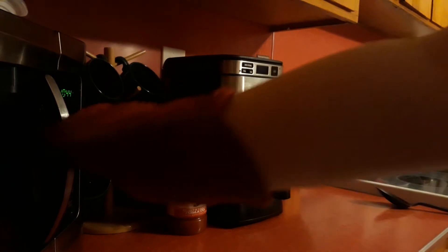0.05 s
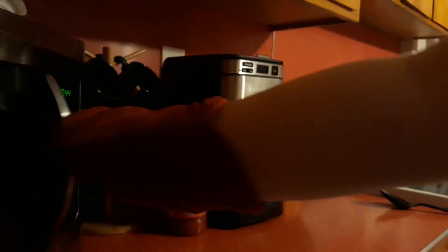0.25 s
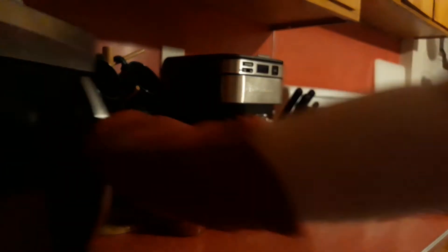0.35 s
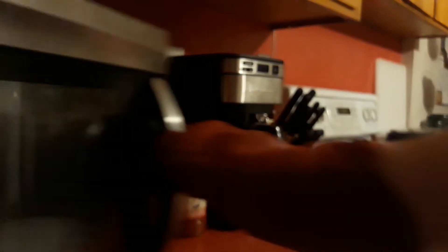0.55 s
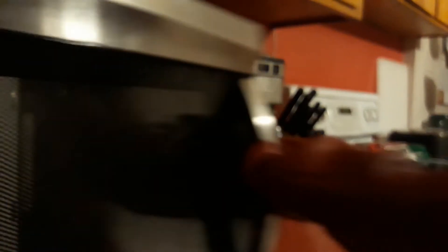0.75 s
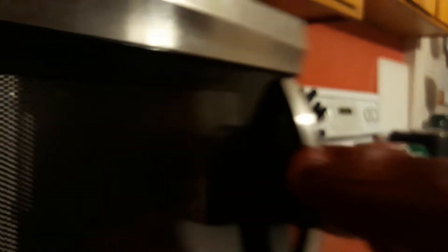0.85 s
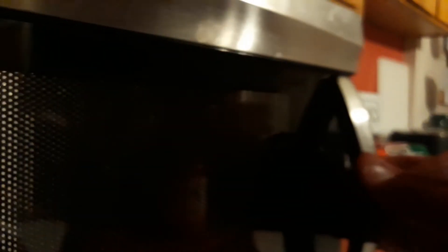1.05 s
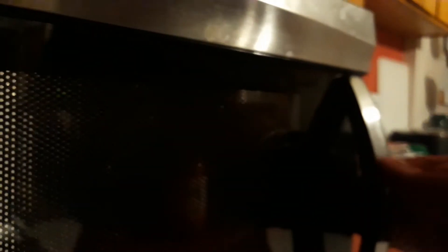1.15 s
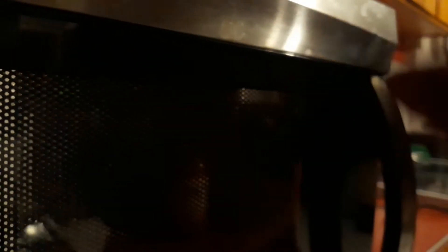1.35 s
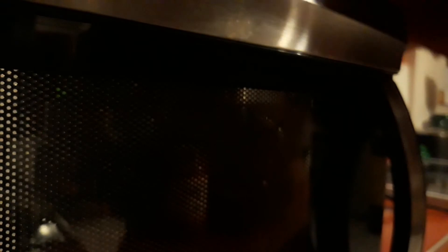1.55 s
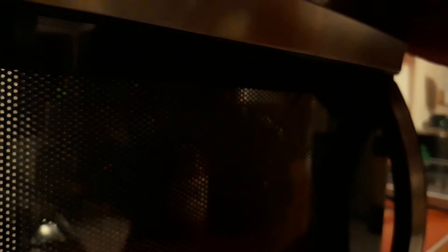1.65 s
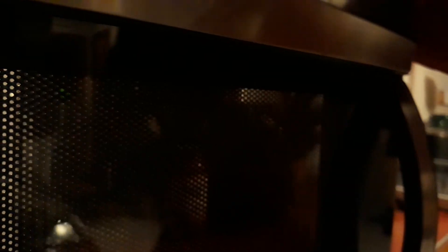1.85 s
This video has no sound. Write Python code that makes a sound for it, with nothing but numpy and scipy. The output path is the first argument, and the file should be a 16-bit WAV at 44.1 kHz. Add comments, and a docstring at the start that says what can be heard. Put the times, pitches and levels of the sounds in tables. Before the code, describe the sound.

A microwave door is pulled open close by in a small kitchen. The handle ticks, the latch snaps free with a loud, ringing clunk, and the door swings with soft knocks before a light plastic click over faint room rumble.

```python
"""In a small kitchen, a microwave door is pulled open at arm's length. The handle ticks under
the strain, then the latch hooks scrape over their catches and snap free. The oven rocks on
its feet, and its steel case booms and rings on. The loose door rattles and swings with a few
soft knocks and a rub of the hinge, then meets its plastic stop with a quick click and rebound.
Behind it all are a low room rumble and a faint hiss."""
import sys
import numpy as np
from scipy import signal
from scipy.fft import rfft, irfft
from scipy.io import wavfile
from scipy.ndimage import uniform_filter1d

SR = 44100
rng = np.random.default_rng(int(sys.argv[2]) if len(sys.argv) > 2 else 0)


def store_wav(level_fs):
    """Save 16-bit WAV to argv[1]."""
    pcm = np.round(np.clip(np.atleast_2d(level_fs), -1, 1) * 32767)
    wavfile.write(sys.argv[1], SR, pcm.T.astype(np.int16))


N = 83790
ALIKE_HZ = 566  # below about this pitch, both ears hear nearly the same


def amp(db):
    """Turn decibels into a number to multiply by."""
    return 10 ** (np.asarray(db) / 20)


def at(points, hz):
    """Look up a pitch in a table, blending between its rows."""
    pitches, values = np.array(points, float).T
    return np.interp(np.log(hz + 1), np.log(pitches), values)


def clock():
    """The time of every sample, in seconds."""
    return np.arange(N) / SR


def freqs():
    """The pitch of every slot in a spectrum, in Hz."""
    return np.arange(N // 2 + 1) * SR / N


def pan(x, balance):
    """Make each pitch louder in one ear than in the other."""
    return irfft(rfft(x) * amp(np.array([[.5], [-.5]]) * at(balance, freqs())), N)


def noise(tone):
    """Stereo noise of strength 1, shaped by a tone table and alike in both ears in the bass."""
    mid, side = rfft(rng.standard_normal((2, N)))
    alike = 1 / (1 + (freqs() / ALIKE_HZ) ** 3)
    both = mid * np.sqrt(1 + alike) + side * np.sqrt(1 - alike) * np.array([[1], [-1]])
    x = irfft(both * amp(at(tone, freqs())), N)
    return x / x.std()


def fade(fade_s):
    """A smooth dying away that falls 60 dB in fade_s seconds."""
    return np.exp(-np.log(1000) * clock() / max(fade_s, .002))


def through(x, response):
    """Play a sound through an object or room, given its response to one sharp tap."""
    return signal.fftconvolve(np.atleast_2d(x), np.atleast_2d(response), axes=1)[:, :N]


def ring(notes, sign=-1, swell_cycles=.14):
    """The fading notes of a struck object; sign=-1 turns every second wave upside down."""
    t, ears, out = clock(), np.array([[.5], [-.5]]), 0
    for k, (hz, db, fade_s) in enumerate(notes):
        envelope = (1 - np.exp(-t * hz / swell_cycles)) * fade(fade_s)
        ear_shift = ears * min(hz / ALIKE_HZ, np.pi / 2)  # high notes reach the ears out of step
        out = out + sign ** k * amp(db) * envelope * np.sin(2 * np.pi * hz * t + ear_shift)
    return out


def push(db, bass, middle, treble, top, size=2048):
    """The short push of one hit, with its own loudness and its own bass, middle, treble and top."""
    hz = np.arange(size // 2 + 1) * SR / size
    tone = at([(200, bass), (500, 0), (900, 0), (1800, middle), (5000, treble), (11000, top)], hz)
    # keep this tone, but pack the energy at the very start (minimum phase)
    cepstrum = irfft(np.log(amp(db + tone)))
    cepstrum[1:size // 2] *= 2
    cepstrum[size // 2 + 1:] = 0
    return irfft(np.exp(rfft(cepstrum)))


def pushes(hits):
    """Place the push of each hit at its start time."""
    out = np.zeros(2 * N)
    for start_s, *levels in hits:
        i, pulse = int(start_s * SR), push(*levels)
        out[i:i + len(pulse)] += pulse
    return out[:N]


def strike(hits, tone, fade_s, size=8192):
    """Each hit wakes so many short notes at once that they blur into a burst of noise."""
    out, dense, decay = np.zeros((2, N)), noise(tone), fade(fade_s)[:size]
    for k, (start_s, *levels) in enumerate(hits):
        i = int(start_s * SR)
        burst = np.roll(dense, -k * (size // 2), axis=1)[:, :size] * decay
        out[:, i:i + size] += through(push(*levels), burst)[:, :size]
    return out


# hooks hitting their catches: start_s, level_db, bass_db, middle_db, treble_db, top_db
# (the last four are added to level_db, each in its own range of pitch)
LATCH_HITS = [(.2215, -24.5, 2.5, -4, 6, 5.5), (.240, -26.5, 3, -9.5, 8, -16.5),
              (.2532, -22, 2, -5.5, 8, 6), (.266, -20.5, -16.5, -1, 6, 12), (.2705, -16, -3.5, 3.5, 8.5, 0),
              (.278, -23.5, -2, 5.5, -4, -7.5), (.286, -23.5, -3, 8.5, 11.5, 6.5),
              (.2925, -10, -6.5, 1.5, -2.5, -1.5), (.302, -14, -1, 1, -5, -2.5),
              (.312, -19, 6, -2.5, -2.5, -15), (.334, -25.5, 6.5, -9, 10.5, 12.5), (.349, -32, -7, 2, 8, 9),
              (.432, -42.5, 10.5, 17, -9, 8), (.508, -45.5, -5, -2, 12.5, 6.5)]
# tone of the oven's panels: pitch_hz, level_db
PANEL_TONE = [(50, -32), (100, 0), (200, 6.5), (400, 3.5), (850, -0.5), (1250, -5.5), (2100, -2.5),
              (3300, -2.5), (5000, -8), (6600, -9.5), (8200, -28), (12000, -21), (16000, -23)]
# ringing notes of the steel case: pitch_hz, level_db, fade_s
CASE_NOTES = [(106, -17.5, .3), (159, -14.5, 0.84), (191.2, -22, 0.68), (232.4, -24, 0.75),
              (300.2, -24.5, 0.86), (330.7, -20, 0.63), (393, -32, 3.1), (403.5, -14.5, 0.15),
              (524, -12.5, 0.21), (571, -12.5, .2), (634.5, -18, 0.31), (834, -12, 0.16)]
# ringing notes of the latch springs: pitch_hz, level_db, fade_s
SPRING_NOTES = [(1819, -34, 1.1), (1991, -15, 0.076), (2186, -34, 0.72), (2308, -18.5, 0.18),
                (5240, -34, 0.46), (5636, -39, 0.99), (5755, -44, 2.2)]
# how much louder the door is in the left ear: pitch_hz, left_minus_right_db
DOOR_BALANCE = [(100, 4), (2400, 2.5), (4400, -1.5), (8000, 7), (15000, 5)]
def latch(room, beat_hz=2.4, beat_depth=.45, echo_db=-6.5):
    """The hooks scrape and snap, shaking the panels, case, springs and hollow inside of the oven."""
    panels = strike(LATCH_HITS, PANEL_TONE, fade_s=.099) + scrape()
    inside = amp(-22) * noise(PANEL_TONE) * fade(.061)
    # the two springs are slightly out of tune, so their ring wobbles
    beat = 1 + beat_depth * np.cos(2 * np.pi * beat_hz * clock())
    metal = through(pushes(LATCH_HITS), ring(CASE_NOTES) + beat * ring(SPRING_NOTES) + inside)
    return pan(panels + amp(echo_db) * through(panels, room) + metal, DOOR_BALANCE)


def scrape(start_s=.219, end_s=.305, grain_s=.0011, rough_db=.5):
    """The hooks slide with a gritty sound, louder as the pull grows."""
    t = clock()
    grit = uniform_filter1d(rng.standard_normal(N), int(grain_s * SR))
    db = np.interp(t, [start_s, end_s], [-31, -21]) + rough_db * grit / grit.std()
    return noise(PANEL_TONE) * amp(db) * (t > start_s) * (t < end_s)


# the oven rocking on its feet: start_s, level_db, pitch_hz, length_s
ROCKING_THUMPS = [(.268, -15.5, 104, 0.051), (.318, -20.5, 112, .046), (0.421, -29, 119.8, .045)]
def thumps():
    """The whole oven is tugged and rocks back: a few deep waves that swell and die."""
    out = np.zeros(N)
    for start_s, db, hz, length_s in ROCKING_THUMPS:
        t = np.clip(clock() - start_s, 0, length_s)
        out += amp(db) * np.sin(np.pi * t / length_s) * np.sin(2 * np.pi * hz * t)
    return pan(out, DOOR_BALANCE)


# dull bumps of the handle, case and hinge: start_s, level_db, pitch_hz
DULL_KNOCKS = [(.033, -29, 458), (0.21, -22.5, 420), (0.218, -19, 200), (0.295, -16, 525), (.512, -31, 746),
               (1.174, -51, 740), (1.257, -43, 750), (1.3465, -29, 340), (1.356, -42.5, 447)]
def knocks(room, swell_cycles=.52, fade_cycles=7.7, echo_db=-14):
    """Each soft bump sounds one note that dies within a few waves."""
    out = np.zeros(N)
    for start_s, db, hz in DULL_KNOCKS:
        cycles = np.maximum(clock() - start_s, 0) * hz
        swell = 1 - np.exp(-cycles / swell_cycles)
        decay = np.exp(-np.log(1000) * cycles / fade_cycles)
        out += 2 * amp(db) * swell * decay * np.sin(2 * np.pi * cycles)
    return pan(out + amp(echo_db) * through(out, room), DOOR_BALANCE)


# the door hitting its stop: start_s, level_db, bass_db, middle_db, treble_db, top_db
STOP_HITS = [(1.5697, -41, 3.5, 16, 14.5, -14), (1.5765, -34.5, -4.5, -2, -1, -13),
             (1.5799, -32.5, -9.5, -9.5, 2.5, -5)]
# hollow notes of the plastic stop: pitch_hz, level_db, fade_s
STOP_NOTES = [(828, 7, 0.035), (1700, -2, 0.043), (1860, 5.5, 0.0066), (2860, 2.5, 0.015),
              (3440, 1.5, 0.009)]
# tone of the stop's crack: pitch_hz, level_db
CRACK_TONE = [(80, 4.5), (500, 0), (1100, -4.5), (1500, 0), (2400, -15.5), (4700, -18), (6200, -11),
              (8500, -31.5), (16000, -44)]
# how much louder the stop is in the left ear: pitch_hz, left_minus_right_db
STOP_BALANCE = [(100, 8.5), (800, 0), (2400, 3), (4400, -5), (8000, 6)]
def door_stop(room, crack_echo_db=-7, hollow_echo_db=-15):
    """The door meets its stop with a hollow plastic click and a duller rebound."""
    hollow = through(pushes(STOP_HITS), ring(STOP_NOTES, sign=1))
    crack = amp(3.5) * strike(STOP_HITS, CRACK_TONE, fade_s=.046)
    echo = through(amp(crack_echo_db) * crack + amp(hollow_echo_db) * hollow, room)
    return pan(hollow + crack + echo, STOP_BALANCE)


# dry ticks of the handle: start_s, level_db, bass_db, middle_db, treble_db, top_db
HANDLE_TICKS = [(.1276, -36, 7.5, -5.5, 5, 7), (.1386, -43.5, -8, -4, 12.5, 15.5),
                (.1605, -39, 4.5, 2, 8.5, 2), (1.3565, -50.5, 8, 12, -8, -13)]
def handle(room, echo_db=-3):
    """The plastic handle ticks as it takes the strain."""
    ticks = strike(HANDLE_TICKS, PANEL_TONE, fade_s=.024)
    return pan(ticks + amp(echo_db) * through(ticks, room), DOOR_BALANCE)


# the door rattling under the pull, then once free: start_s, end_s, start_level_db, end_level_db
RATTLE_SPELLS = [(0.107, 0.221, -45.5, -36.5), (0.616, .69, -55, -41)]
# dull tone of the door frame: pitch_hz, level_db
FRAME_TONE = [(70, -6.5), (140, 1.5), (300, -3.5), (1000, -29), (4000, -51.5)]
def rattle(taps_per_s=220):
    """Many light, uneven taps of the loose door blur into a soft rattle."""
    t, taps = clock(), np.zeros(N)
    for start_s, end_s, start_db, end_db in RATTLE_SPELLS:
        random_taps = rng.standard_normal(N) * (rng.random(N) < taps_per_s / SR)
        db = np.interp(t, [start_s, end_s], [start_db, end_db])
        taps += random_taps * amp(db) * (t > start_s) * (t < end_s)
    frame = noise(FRAME_TONE) * fade(.07)
    frame /= np.sqrt(np.sum(frame ** 2) / 2 * taps_per_s / SR)  # equally loud at any tap rate
    return pan(through(taps, frame), DOOR_BALANCE)


# tone of the rubbing hinge: pitch_hz, level_db
HINGE_TONE = [(120, -6.5), (280, 1), (450, 8), (590, -30), (770, 3), (1100, -47), (3000, -34),
              (8000, -59.5)]
def hinge(peak_s=1.273, rise_db_per_s=142, fall_db_per_s=108, squeak_hz=4750, width_hz=60):
    """A soft rub and a thin, unsteady squeak swell and fade as the door swings."""
    past_peak_s = clock() - peak_s
    swell = amp(np.minimum(past_peak_s * rise_db_per_s, -past_peak_s * fall_db_per_s))
    spectrum = rfft(rng.standard_normal((2, N)))
    squeak = irfft(spectrum / (1 + ((freqs() - squeak_hz) / width_hz) ** 2), N)
    rub = amp(-49) * noise(HINGE_TONE)
    return pan(swell * (rub + amp(-68) * squeak / squeak.std()), DOOR_BALANCE)


# how long the kitchen's echo lasts: pitch_hz, fade_s
ECHO_FADES = [(100, 0.62), (300, 0.67), (2000, 0.49), (5000, 0.43), (9000, 0.21)]
def kitchen(bands=10, build_s=.004):
    """The room answers a tap with a smooth wash of echoes; the high pitches die first."""
    white = rfft(noise([(20, 0), (20000, 0)]))
    pitches, tail = np.geomspace(60, 16000, bands), 0
    for hz, share in zip(pitches, np.eye(bands)):
        band = irfft(white * at(list(zip(pitches, share)), freqs()), N)
        tail = tail + band * fade(at(ECHO_FADES, hz))
    tail *= 1 - np.exp(-clock() / build_s)
    return tail / np.sqrt(np.sum(tail ** 2) / 2)


# tone of the low room rumble: pitch_hz, level_db
RUMBLE_TONE = [(25, -20.5), (55, -16), (85, 1), (120, 1), (175, -2.5), (260, -14), (420, -24.5), (800, -39),
               (2000, -72)]
# tone of a soft rushing sound in the middle pitches: pitch_hz, level_db
RUSH_TONE = [(200, -1.5), (420, 2.5), (620, -1.5), (830, -1), (1300, -6), (2100, -2.5), (3000, -3),
             (4200, -3.5), (8000, -43.5)]
# tone of the faint high hiss: pitch_hz, level_db
HISS_TONE = [(1500, -21.5), (3000, -25.5), (4300, -1.5), (6300, -1.5), (8300, -23), (11000, -18.5),
             (15500, -14)]
# how the rush and the hiss rise and fall: time_s, rush_db, hiss_db
AIR_LEVELS = [(0, -50.5, -59.5), (0.099, -58.5, -65), (.2, -57.5, -81), (.55, -48.5, -61),
              (.68, -60.5, -56), (.8, -65.5, -66), (1.03, -75, -65.5), (1.2, -66, -61.5),
              (1.271, -60, -60.5), (1.328, -52, -52), (1.41, -60.5, -62.5), (1.54, -61.5, -56.5),
              (1.65, -55.5, -57), (1.788, -50.5, -56), (1.9, -55, -59.5)]
# how much louder the background is in the left ear: pitch_hz, left_minus_right_db
AIR_BALANCE = [(100, 2.5), (500, 2.5), (2400, 1.5), (4400, -4.5), (8000, 3), (15000, -2)]
def background(rumble_db=-53.5):
    """The room rumbles steadily; a soft rush and hiss sink after the clunk and swell again."""
    time_s, rush_db, hiss_db = np.array(AIR_LEVELS).T
    rush = noise(RUSH_TONE) * amp(np.interp(clock(), time_s, rush_db))
    hiss = noise(HISS_TONE) * amp(np.interp(clock(), time_s, hiss_db))
    return pan(rush + hiss + amp(rumble_db) * noise(RUMBLE_TONE), AIR_BALANCE)


def scene():
    """Add up the sounds of the door and its kitchen."""
    room = kitchen()
    door = handle(room) + rattle() + latch(room) + thumps() + knocks(room) + hinge() + door_stop(room)
    return door + background()


def record(dry, low_cut_hz=50, high_cut_hz=15850):
    """Cut the deep bass, clip any peak beyond full scale, then cut the highest treble."""
    bass_cut = signal.butter(4, low_cut_hz, "high", fs=SR, output="sos")
    treble_cut = signal.ellip(10, .1, 80, high_cut_hz, fs=SR, output="sos")
    clipped = np.clip(signal.sosfilt(bass_cut, dry), -1, 1)
    return signal.sosfilt(treble_cut, clipped)


dry = scene()
out = record(dry)
store_wav(out)
```